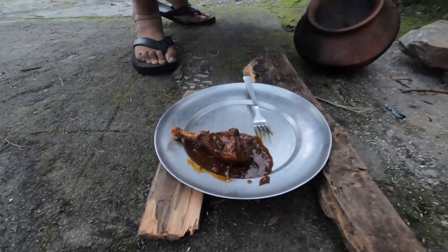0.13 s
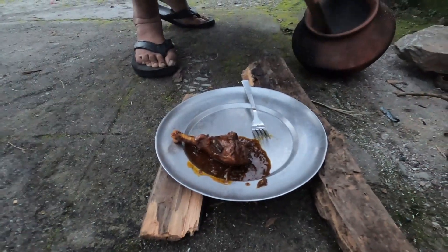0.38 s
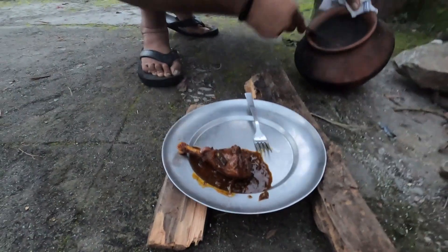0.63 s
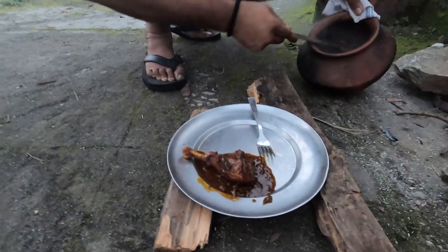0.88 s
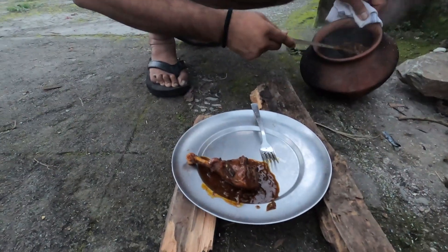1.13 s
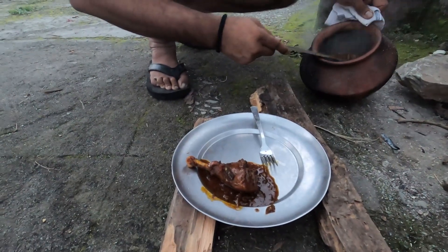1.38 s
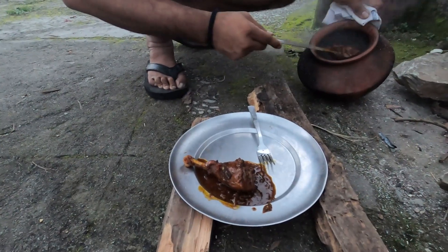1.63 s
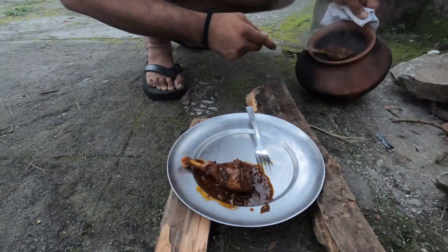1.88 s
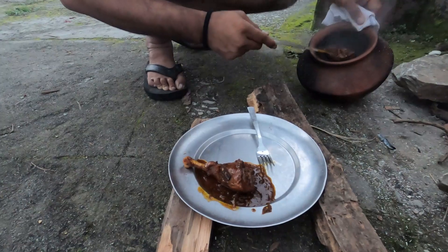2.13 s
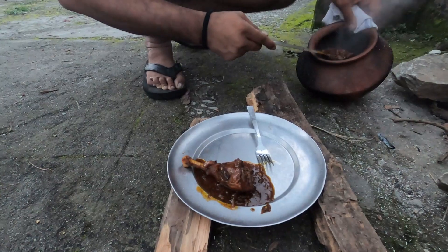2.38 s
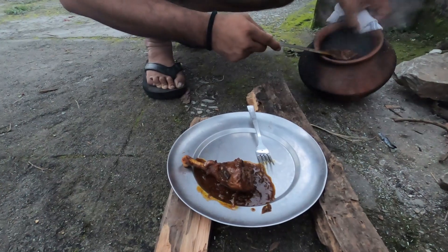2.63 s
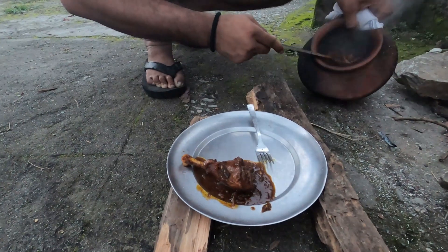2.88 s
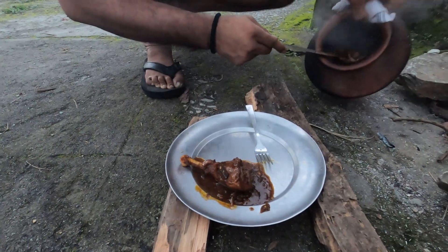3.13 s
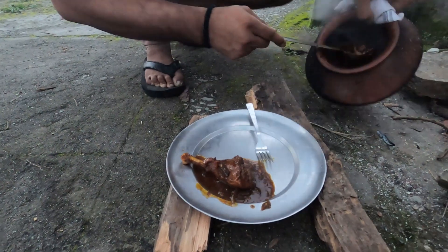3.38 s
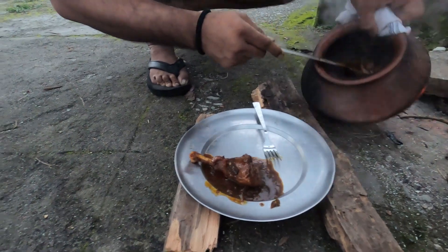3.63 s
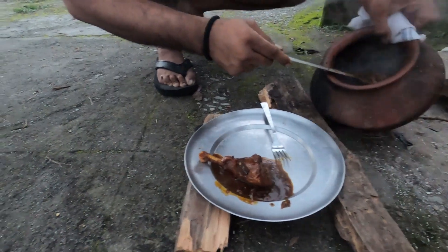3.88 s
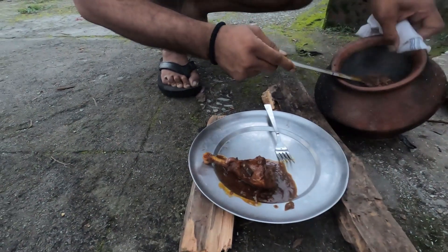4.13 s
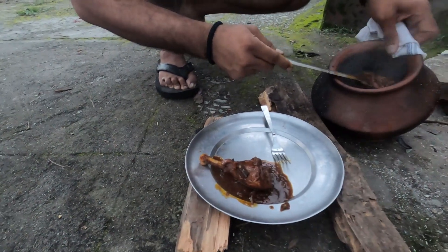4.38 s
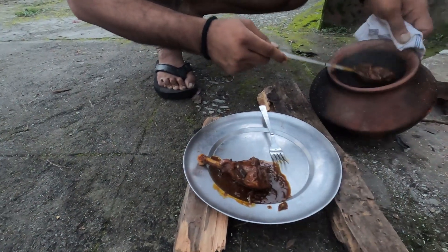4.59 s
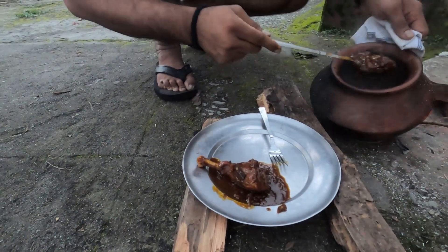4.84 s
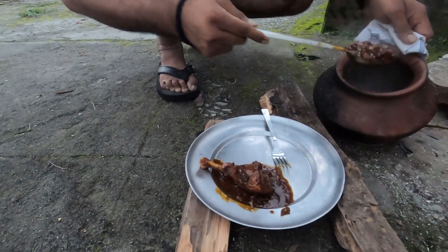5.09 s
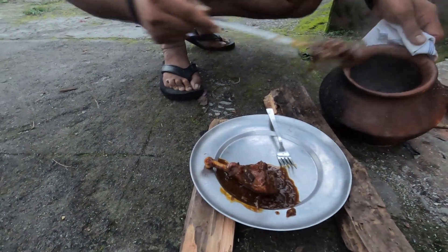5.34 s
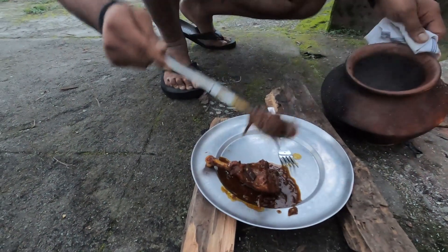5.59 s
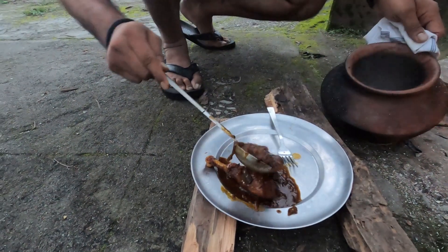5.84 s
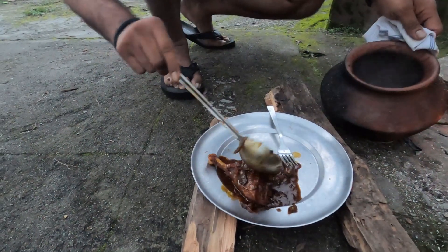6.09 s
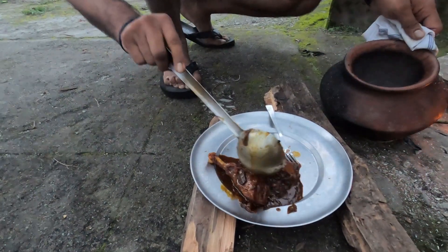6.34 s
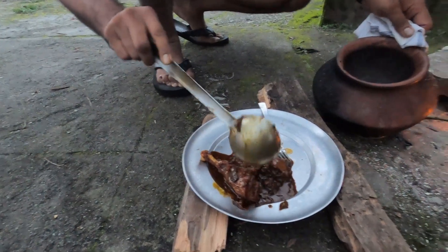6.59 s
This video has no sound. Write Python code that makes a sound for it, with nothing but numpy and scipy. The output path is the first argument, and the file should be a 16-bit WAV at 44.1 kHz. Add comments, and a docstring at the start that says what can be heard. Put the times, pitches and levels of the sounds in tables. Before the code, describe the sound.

Outdoors, close to the microphone, a metal ladle scrapes and knocks a clay pot, busiest in the first second. Hot gravy crackles lightly, with sharper pops later. Scattered bumps follow, including a deep thud past the middle. Near the end the ladle squeaks briefly, taps a steel plate and gives one very loud clank. Very deep gusts of wind push the microphone throughout, over faint hiss and a low murmur.

```python
"""Gusty wind outdoors shoves the microphone far below hearing, up to full scale, over hiss and a low murmur.
A clay pot is dragged and tipped on stony ground: its wall modes ring to knocks and scrapes of a metal
ladle, densest in the first second. Hot gravy crackles throughout as short rising sine bursts, with louder
pops from 1.65 s; faint thin sine tones come and go from 1.3 s. From about 5.8 s the ladle slides on a steel
plate, a second bank of modes, squeaking once near 5.9 s and then tapping and sliding on."""
import sys
import numpy as np
from scipy import signal
from scipy.fft import rfft, irfft
from scipy.io import wavfile
from scipy.ndimage import uniform_filter1d

SR = 44100
rng = np.random.default_rng(int(sys.argv[2]) if len(sys.argv) > 2 else 0)


def elevation(decibels):
    """Turn decibel levels (scalar or array-like) into linear amplitude ratios."""
    levels = np.asarray(decibels, float)
    return 10 ** (levels / 20)


def pcm_store(signal):
    """Save signal as 16-bit PCM."""
    levels = np.round(np.clip(np.atleast_2d(signal), -1, 1) * 32767)
    wavfile.write(sys.argv[1], SR, levels.astype(np.int16).T)


N = 296872  # samples


def evened(x):
    """Scales to rms 1."""
    return x / np.sqrt(np.mean(x ** 2) + 1e-20)


def curve(rows):
    """Reads every column of a time table, sample by sample."""
    s, *columns = np.transpose(rows)
    return [np.interp(np.arange(N) / SR, s, column) for column in columns]


def noise():
    """White noise as long as the scene."""
    return rng.standard_normal(N)


def coloured(x, points):
    """Gives x the spectrum drawn by points, at rms 1."""
    point_hz, point_db = np.transpose(points)
    hz = np.fft.rfftfreq(len(x), 1 / SR)
    shape_db = np.interp(np.log(hz + 0.024), np.log(point_hz), point_db)
    return evened(irfft(rfft(x) * elevation(shape_db), len(x)))


def steadied(x, seconds):
    """Divides out chance swells slower than seconds."""
    size = int(seconds * SR)
    power = uniform_filter1d(uniform_filter1d(x ** 2, size), size)
    return evened(x / np.sqrt(abs(power) + .03))


def wobble(size, seconds, count=1):
    """Smooth chance, rms 1, changing within about seconds."""
    width = int(seconds * SR)
    return evened(uniform_filter1d(uniform_filter1d(rng.standard_normal((count, size)), width), width))


def add(mix, s, sound):
    """Mixes a sound in at time s."""
    part = mix[round(s * SR):][:len(sound)]
    part += sound[:len(part)]


def resonate(x, hz, width):
    """A resonance that can glide: shifts the pitch hz down to zero, smooths, and shifts back."""
    turn = np.exp(2j * np.pi * np.cumsum(hz * np.ones(len(x))) / SR)
    r = np.exp(-np.pi * width / SR)
    return 2 * (turn * signal.lfilter([1 - r], [1, -r], x / turn)).real


def near(hz, centre_hz, spread):
    """Bell-shaped weight around a pitch, spread in octaves."""
    return np.exp(-(np.log2(hz / centre_hz) / spread) ** 2 / 2)


def slips(size, per_s, spread_db, smooth):
    """Uneven stick-slip clicks over a smoother hiss."""
    sizes_db = spread_db * np.minimum(rng.exponential(1, size), 3)
    clicks = elevation(sizes_db) * (rng.random(size) < per_s / SR)
    return evened(clicks * rng.choice([-1, 1], size)) + smooth * rng.standard_normal(size)


# Spectrum of the slow heave. Each row: frequency in Hz, relative density in dB per Hz.
HEAVE_SPECTRUM = [(.5, 4), (10, 0.5), (14, -5), (18, -25.5), (24, -14), (32, -73), (45, -93), (200, -170)]
# Strength of the heave ahead of the soft stop. Each row: time in seconds, level in dB before the eddies.
HEAVE_LEVEL = [(0.0, -11), (0.13, 0), (0.17, -14.5), (0.43, -1), (0.49, -7.5), (1.08, -9.5), (1.31, -2),
               (1.42, -14.5), (1.7, -7), (1.93, -18.5), (2.62, -12.5), (2.75, -29.5), (2.92, -12.5),
               (3.9, -19), (3.94, -8), (4.63, -18), (4.95, -11.5), (5.08, -13), (5.34, -6.5), (5.47, -12),
               (5.57, -18.5), (5.66, -12), (6.05, -20.5), (6.17, -5), (6.69, -20), (6.73, -48)]
# Spectrum of the audible buffeting. Each row: frequency in Hz, relative density in dB per Hz.
BUFFET_SPECTRUM = [(12, -28), (22, -1.5), (30, 3.5), (45, -5.5), (70, -20), (110, -29.5), (200, -65.5),
                   (400, -100), (2000, -150)]
# Strength of the buffeting. Each row: time in seconds, level in dB before the eddies.
BUFFET_LEVEL = [(0.0, -24), (0.03, -18.5), (0.17, -30.5), (0.24, -20), (0.39, -30), (0.67, -24),
                (0.71, -30.5), (0.82, -28), (1.07, -39.5), (1.31, -16.5), (1.44, -50), (1.52, -35),
                (1.63, -34.5), (1.78, -50), (1.85, -50), (1.91, -62), (2.06, -36), (2.12, -52), (2.21, -35),
                (2.34, -63), (2.49, -31.5), (2.53, -43), (2.64, -33), (2.85, -60), (3.2, -38.5),
                (3.28, -39.5), (3.84, -49), (3.97, -46), (4.03, -53), (4.23, -49), (4.52, -43), (4.57, -61),
                (4.78, -37), (4.85, -45), (4.95, -30.5), (5.08, -48), (5.85, -46), (5.98, -33), (6.07, -59),
                (6.73, -42)]


def wind():
    """Slow pressure lumps drive the membrane to a soft stop; faster buffeting rides on top; eddies shake both."""
    heave_eddy, buffet_eddy = wobble(N, 0.094, count=2)
    heave_db = curve(HEAVE_LEVEL)[0] + 0.5 * heave_eddy
    push = elevation(heave_db) * steadied(coloured(noise(), HEAVE_SPECTRUM), 0.051)
    stopped = push / (1 + push ** 4) ** (1 / 4)
    heave = signal.sosfiltfilt(signal.butter(4, 23, fs=SR, output="sos"), stopped)
    buffet_db = curve(BUFFET_LEVEL)[0] + 2.5 * buffet_eddy
    buffet = steadied(coloured(noise(), BUFFET_SPECTRUM), 0.048)
    return heave + elevation(buffet_db) * buffet


# Spectrum of the open-air hiss. Each row: frequency in Hz, relative density in dB per Hz.
AIR_SPECTRUM = [(41, -14.5), (70, -1), (92, -7.5), (194, -15), (326, -13), (438, -9.5), (537, -21.5),
                (629, -18.5), (1060, -30), (1300, -23.5), (1550, -30), (3930, -29.5), (15600, -48.5)]
# Hollows that hum. Each row: pitch in Hz, width of each of two filter passes in Hz, relative level in dB.
HOLLOWS = [(132, 63, 1.5), (237.7, 76, -5.5), (91, 97, -5)]
# Level of the murmur over time, lowest near 1.2 s. Each row: time in seconds, level in dB.
MURMUR_LEVEL = [(0, -52), (.62, -51), (.8, -61), (1.2, -69), (2.2, -54), (4.09, -54.5), (4.54, -60.5),
                (5.04, -58.5), (5.94, -53.5), (6.43, -56.5), (6.73, -56)]


def air():
    """Soft broad hiss; below it a murmur that hums in nearby hollows; hiss and hums each waver."""
    *hum_wavers, hiss_waver = wobble(N, 0.021, count=len(HOLLOWS) + 1)
    murmur = np.zeros(N)
    for (hz, width, db), waver in zip(HOLLOWS, hum_wavers):
        hum = resonate(resonate(noise(), hz, width), hz, width)
        murmur += elevation(db + 3 * waver) * evened(hum)
    hiss = elevation(-55 + 2.2 * hiss_waver) * coloured(noise(), AIR_SPECTRUM)
    return hiss + elevation(curve(MURMUR_LEVEL)[0]) * evened(murmur)


# Faint thin tones. Each row: start in seconds, end in seconds, start pitch in Hz, end pitch in Hz
# (both before drift), level in dB before flutter.
WHISTLES = [(1.326, 1.36, 1316, 1280, -68), (1.455, 1.64, 1320, 1320, -65.5),
            (1.667, 1.872, 1320, 1317, -65.5), (1.934, 2.06, 1320, 1317, -84),
            (2.3, 2.344, 1360, 1484, -65.5), (2.335, 2.4, 1446, 1420, -65), (2.366, 2.396, 1464, 1300, -71),
            (2.357, 2.578, 1344, 1282, -64.5), (2.587, 2.745, 1325, 1305, -65),
            (2.794, 3.114, 1326, 1346, -70), (3.317, 3.49, 224, 239.6, -53.5),
            (4.152, 4.262, 801, 795, -57), (4.634, 4.75, 1233, 1220, -68), (4.804, 5.075, 1224, 1287, -72),
            (4.97, 5.27, 1322, 1305, -63), (5.223, 5.496, 1320, 1320, -70.5),
            (5.504, 5.58, 1276, 1230, -58.5), (5.962, 6.03, 969, 960, -56.5),
            (6.527, 6.76, 1296, 1320, -65.5), (6.541, 6.74, 3760, 3750, -68.5)]
# The ladle's one squeak: start in seconds, end in seconds, fundamental in Hz.
SQUEAK = (5.865, 5.935, 500)
# Overtones of the squeak. Each row: multiple of the fundamental, level in dB before flutter.
SQUEAK_OVERTONES = [(2, -68), (3, -66), (4, -67), (5, -69), (6, -63), (8, -73)]


def thin_tones():
    """Gliding sines for the tones and the squeak, each blurred by narrow noise and wavering."""
    out = np.zeros(N)
    start, end, pitch_hz = SQUEAK
    squeak = [(start, end, k * pitch_hz, k * pitch_hz, db) for k, db in SQUEAK_OVERTONES]
    for start, end, start_hz, end_hz, db in list(WHISTLES) + squeak:
        size = int((end - start) * SR)
        drift, flutter = wobble(SR, .02, count=2)[:, :size]
        hz = np.linspace(start_hz, end_hz, size) + 5 * drift
        blur = evened(resonate(rng.standard_normal(SR)[:size], hz, 30))
        tone = np.sin(2 * np.pi * np.cumsum(hz) / SR) + 0.5 * blur
        add(out, start, elevation(db + 2 * flutter) * tone * signal.windows.tukey(size, .45))
    return out


def pop(hz, cycles):
    """A bursting bubble: a few cycles, rising slightly."""
    turns = np.arange(300) / SR * hz
    return np.sin(2 * np.pi * turns * (1 + 0.0018 * turns)) * np.exp(-turns / cycles) * np.minimum(turns / 2, 1)


# The loudest bursting bubbles. Each row: time in seconds, level in dB before the burst's own
# envelope, starting pitch in Hz.
POPS = [(1.6508, -43, 3900), (1.6966, -41, 7500), (1.8667, -38.5, 6060), (1.9151, -46, 3670),
        (2.0189, -37, 7340), (2.1033, -44, 3830), (2.2188, -41, 3800), (2.3865, -42, 4500),
        (2.4435, -41.5, 3800), (2.5301, -40.5, 3900), (2.5735, -47, 3000), (2.794, -39, 7000),
        (3.102, -45, 5540), (3.113, -44, 8000), (3.136, -45, 8700), (3.15, -48, 5500), (3.198, -43, 7500),
        (3.199, -45, 10000), (3.25, -48, 7750), (3.292, -46, 4080), (3.44, -46, 7600), (3.476, -44, 7740),
        (3.3428, -42, 3370), (3.3739, -37.5, 7600), (3.5194, -40, 7240), (3.6135, -38.5, 7260),
        (3.627, -41, 3700), (3.66, -43, 5800), (3.801, -52, 5500), (3.896, -46, 5200), (3.903, -51, 6800),
        (3.961, -46, 6200), (4.092, -43, 7220), (4.207, -47, 7200), (4.295, -46, 4700), (4.18, -43, 6440),
        (4.4046, -40, 6400), (4.7039, -42.5, 6800), (4.76, -38, 6600), (4.879, -40, 3940),
        (5.1295, -42, 3500), (5.4507, -40, 9900), (5.5205, -36, 9550), (5.6765, -43, 3200),
        (5.7785, -44, 6460), (5.806, -49, 5200), (5.8262, -38.5, 3800), (5.98, -39.5, 4000),
        (6.466, -41, 3300), (6.581, -44, 7860), (6.636, -50, 5000), (6.636, -50, 7700), (6.71, -51, 4900)]
# Upper pitches of the small bubbles in Hz; each bubble sounds somewhat below one of them.
SIZZLE_TOPS = [2940, 3800, 4000, 5000, 6600, 6400, 7500, 8000, 10400, 13100]


def gravy():
    """Loud pops over a scatter of small ones; the pot wall throws each back a moment later."""
    out = np.zeros(N)
    for s, db, hz in POPS:
        add(out, s, elevation(db) * pop(hz, 3.5))
    when, pitch, detune, size = rng.random((1500, 4)).T
    times = np.cumsum(-np.log(1 - when)) / 70  # 70 small pops a second on average
    tops = np.take(SIZZLE_TOPS, (pitch * len(SIZZLE_TOPS)).astype(int))
    pitches = tops * (0.515 + 0.46 * detune)
    levels_db = -57 - 3.5 * np.log(1 - .985 * size)
    for s, hz, db in zip(times, pitches, levels_db):
        add(out, s, elevation(db) * pop(hz, 2.5))
    # each later echo also repeats the earlier ones
    for delay_s, db in ((.0025, -10), (.0085, -14), (.0125, -12)):
        add(out, delay_s, elevation(db) * out[:N - round(delay_s * SR)].copy())
    return out


# Light, unbroken rubbing on clay. Each row: time in seconds, grit level in dB, low ring level in dB.
DRAG_LEVELS = [(0, -61, -58), (.8, -62, -62), (1.42, -66, -68), (2.53, -63, -64), (2.96, -62, -58),
               (3.67, -60, -62), (4.22, -61, -60), (4.8, -64, -64), (5.7, -63, -62), (6.3, -63, -59),
               (6.73, -62, -63)]
# Spectrum of the grit. Each row: frequency in Hz, relative density in dB per Hz.
GRIT_SPECTRUM = [(590, -9), (1000, -3.5), (1400, -6), (1760, -8), (2040, -3), (3160, -6.5), (3460, -7),
                 (5180, -17.5), (7750, -11.5), (15600, -23.5)]


def drag():
    """Faint grit, and a low ring of the pot wall set off in lumps by small nudges."""
    grit_db, low_db = curve(DRAG_LEVELS)
    nudges = slips(N, 30, 3, 0.52)
    low = steadied(evened(resonate(resonate(nudges, 438, 60), 438, 90)), .2)
    grit = steadied(coloured(slips(N, 300, 4.0, 0.8), GRIT_SPECTRUM), .12)
    return elevation(grit_db) * grit + elevation(low_db) * low


def strokes(rows, modes, bare, damping):
    """Slips excite the modes near the stroke's pitch; part of the grit is heard bare."""
    bite_s, lift_s, ease_db_per_s = 0.008, 0.055, -15  # a stroke bites in, eases off and lifts
    out = np.zeros(N)
    bins = np.fft.rfftfreq(SR, 1 / SR) + 1
    hz, db, t60 = np.transpose(modes)[:, :, None]
    half_width = 1.22 / (t60 * damping)  # Hz
    body = (elevation(db) * half_width / (half_width + 1j * (bins - hz))).sum(0) + bare
    for start, end, level_db, centre_hz, spread in rows:
        size = int((end - start) * SR)
        judder_db = 3 * wobble(SR, .004)[0]  # uneven pressure
        rough = (slips(SR, 700, 3.2, 1.27) * elevation(judder_db))[:size]
        t = np.arange(size) / SR
        edges = np.minimum(t / bite_s, 1) * np.minimum(t[::-1] / lift_s, 1)
        shape = edges * elevation(level_db + ease_db_per_s * (t - t.mean()))
        sound = irfft(rfft(rough * shape, SR) * body * near(bins, centre_hz, spread))[:size + 2000]
        add(out, start, sound * np.linalg.norm(shape) / np.linalg.norm(sound))
    return out


def blows(events, modes, firm_damping, crack, clatter, clatter_s, rise_turns):
    """Each blow rings modes near its pitch; a short crack and dense clatter stand for countless finer modes."""
    firm_db, longer_per_db = -34, 0.012  # firm_damping holds at this level; harder blows ring longer
    contact_s = 0.00078  # shortest rise of a blow
    out = np.zeros(N)
    t = np.arange(SR // 4) / SR
    hz, db, t60 = np.transpose(modes)[:, :, None]
    bins = np.fft.rfftfreq(len(t), 1 / SR) + 1
    above = np.minimum(bins / hz.min(), 1) ** 3  # thins the noise below the lowest mode
    for s, level_db, centre_hz, spread in events:
        damping = firm_damping * np.exp(longer_per_db * (level_db - firm_db))
        # where it lands sets a little strength (dB) and phase (turns)
        place_db, place_turns = rng.random((2, len(modes), 1)) * [[[3.5]], [[.3]]]
        strength = near(hz, centre_hz, spread) * elevation(db + place_db - 60 * t / (t60 * damping))
        ring = (strength * np.sin(2 * np.pi * (hz * t + place_turns))).sum(0)
        tint = above * near(bins, 0.97 * centre_hz, 1.27 * spread)
        puff = evened(irfft(rfft(rng.standard_normal(len(t))) * tint, len(t)))
        crack_fade = crack * elevation(-60 * t / (.04 * damping))
        clatter_fade = clatter * elevation(-60 * t / (clatter_s * damping))
        # low blows are soft, slow contacts
        rise_s = rise_turns / centre_hz + contact_s
        onset = np.sin(np.pi / 2 * np.minimum(t / rise_s, 1)) ** 2
        hit = ring / abs(ring).max() + (crack_fade + clatter_fade) * puff
        add(out, s, elevation(level_db) * hit * onset)
    return signal.sosfilt(signal.butter(4, .8 * hz.min(), "high", fs=SR, output="sos"), out)


# Steel plate under food. Each row: mode in Hz, relative level in dB, 60 dB decay in seconds before damping.
PLATE_MODES = [(536, -10.5, 0.19), (688, 0.5, 0.12), (766, 9.5, 0.052), (880, -3, 0.14), (1070, -9, 0.18),
               (1140, -6, 0.12), (1332, -0.5, 0.085), (1478, 9.5, 0.053), (1540, -6, 0.17),
               (2045, -43, 0.076), (1776, -26, 0.11), (2540, -15.5, 0.17), (2640, 1.5, 0.036),
               (2730, -2.5, 0.039), (2800, -15, 0.078), (3100, 1.5, 0.05), (3180, -11, 0.11),
               (3300, 1.5, 0.044), (3350, -12, 0.12), (3760, -16, 0.14), (3850, -15.5, 0.18),
               (4670, -25, .15), (5000, -11, .05), (5100, -28, .12), (5800, -3, 0.16), (6400, -4, 0.12),
               (7900, 13, 0.021)]
# Strokes along the plate. Each row: start in seconds, end in seconds, level in dB at mid-stroke,
# best-driven pitch in Hz, spread in octaves.
SLIDES = [(5.79, 5.85, -59, 1030, 0.22), (5.845, 5.96, -56.5, 1390, 0.64), (6.025, 6.085, -48, 850, 0.11),
          (6.03, 6.085, -47.5, 1560, 0.97), (6.21, 6.33, -61.5, 1310, 0.11), (6.5, 6.76, -66.5, 1270, 0.23),
          (6.58, 6.72, -65, 3800, 0.087)]
# Ladle on the plate. Each row: time in seconds, level in dB, best-driven pitch in Hz, spread in octaves.
TAPS = [(5.977, -35, 1040, 0.76), (6.0276, -28, 814, 0.33), (6.028, -34, 2600, 0.72),
        (6.0455, -30.5, 2520, 0.15), (6.049, -35.5, 1480, 0.12), (6.3385, -33, 2980, 0.86),
        (6.3875, -5.5, 1210, 1), (6.388, -14, 3180, 0.22), (6.496, -41.5, 1280, 0.16),
        (6.497, -42.5, 3800, 0.15)]


def plate():
    """Steel modes slid along and tapped by the ladle; food shortens the taps' ring times."""
    slides = strokes(SLIDES, PLATE_MODES, bare=0.97, damping=2.4)
    taps = blows(TAPS, PLATE_MODES, firm_damping=0.61, crack=0.049, clatter=0.054, clatter_s=0.14,
                 rise_turns=0.35)
    return slides + taps


# Clay pot. Each row: mode in Hz, relative level in dB, 60 dB decay in seconds before damping.
POT_MODES = [(67, -9, 0.08), (104, 11, 0.087), (232, 9, 0.074), (300, -25, 0.048), (435, 20, 0.091),
             (550, -23, 0.06), (663, 10, 0.079), (850, 18.5, 0.049), (1155, 6.5, 0.025), (1320, 1, 0.037),
             (1570, -21, 0.019), (1855, 6.5, 0.021), (1990, -0.5, 0.059), (2400, 7, 0.049),
             (2837, 1, 0.015), (3292, 3.5, 0.085), (3800, 8, 0.044), (6060, 5.5, 0.025), (7000, 4, 0.0073)]
# Strokes along the pot; a firm one grinds high and makes the wall hum low. Each row: start in seconds,
# end in seconds, level in dB at mid-stroke, best-driven pitch in Hz, spread in octaves.
SCRAPES = [(0, .10, -49, 1490, 1.2), (.146, .275, -53.5, 2620, 0.77), (.146, .255, -55, 8140, 0.91),
           (.325, .56, -48, 2740, 0.56), (.33, .53, -59, 8650, 0.95), (.365, .405, -38, 2580, 0.52),
           (.415, .45, -42, 3000, 0.44), (.36, .545, -39.5, 405, 0.43), (.35, .42, -44.5, 1070, 0.63),
           (.39, .5, -48.5, 253, 0.11), (.44, .51, -55, 7000, 0.49), (.61, .765, -52, 2400, 0.79),
           (.61, .775, -60.5, 8140, 0.93), (.61, .665, -43, 900, 0.15), (.665, .745, -47.5, 925, 0.15),
           (.80, 1.03, -60.5, 1470, 0.14), (.79, 1.06, -60, 2800, 0.63), (.92, 1.09, -59, 435, 0.4),
           (2.733, 2.85, -60, 2370, 0.23), (2.82, 2.955, -58.5, 1970, 0.2), (2.96, 3.14, -60, 433, 0.31),
           (2.83, 2.9, -54, 2920, 0.6), (2.885, 2.96, -53.5, 2800, 0.53), (2.84, 2.96, -63.5, 7250, 0.54),
           (3.2, 3.6, -66, 670, 0.15), (4.1, 4.33, -63, 2630, 0.49)]
# Blows on the pot; a heavy one is a low thud and a brighter tick close together. Each row: time in
# seconds, level in dB, best-driven pitch in Hz, spread in octaves.
KNOCKS = [(0.006, -31.5, 860, 0.11), (0.0229, -24.5, 850, 0.053), (0.023, -29, 440, 0.17),
          (0.146, -34.5, 880, 0.09), (0.1476, -36.5, 2400, 0.66), (0.1735, -24.5, 900, 0.21),
          (0.174, -28.5, 2020, 0.38), (0.1745, -33.5, 280, 0.28), (0.3329, -37.5, 2570, 0.43),
          (0.3555, -27, 824, 0.32), (0.356, -37, 2230, 0.25), (0.393, -33.5, 2430, 0.4),
          (0.4235, -35, 2930, 0.32), (0.462, -37, 1090, 0.19), (0.4817, -34.5, 2400, 0.7),
          (0.5675, -40.5, 1150, 0.51), (0.611, -44, 2500, 0.13), (0.612, -54, 3800, 0.15),
          (0.678, -39, 1270, 0.36), (0.7445, -35, 1950, 0.88), (0.745, -53, 3640, 0.16),
          (0.811, -41.5, 2950, 0.083), (0.883, -61, 3400, 0.17), (0.9235, -42, 3200, 0.25),
          (0.931, -39, 440, 0.17), (0.962, -46.5, 4940, 0.25), (0.968, -37.5, 2750, 0.15),
          (0.977, -35.5, 450, 0.38), (0.978, -36, 1810, 0.15), (0.9775, -36, 1180, 0.23),
          (1.024, -42, 437, 0.15), (1.076, -51, 435, 0.13), (1.076, -48, 3520, 0.17),
          (1.144, -50, 2500, 0.24), (1.7182, -48, 614, 0.57), (1.9986, -38, 429, 0.056),
          (2.5738, -48, 1950, 1.2), (2.587, -34.5, 305, 0.14), (2.588, -38, 1530, 0.55),
          (2.741, -57, 2350, 0.15), (2.762, -44, 435, 0.13), (2.779, -41.5, 1390, 0.55),
          (2.811, -41, 1000, 0.77), (2.8838, -36.5, 2460, 0.21), (2.8845, -46, 7000, 0.77),
          (2.886, -50, 440, 0.15), (2.915, -45, 3300, 0.3), (2.943, -46, 427, 0.13),
          (3.1686, -45, 990, 0.77), (3.197, -60, 1410, 0.42), (3.257, -61, 800, 0.28),
          (3.5073, -46, 1910, 0.15), (3.5563, -39.5, 1390, 0.16), (3.683, -43.5, 450, 0.29),
          (3.684, -48.5, 2100, 0.092), (3.8013, -45, 5000, 0.47), (3.821, -28, 240, 0.52),
          (3.8242, -34.5, 764, 0.62), (3.8326, -34.5, 1630, 0.97), (4.0589, -38.5, 300, 0.33),
          (4.2863, -49.5, 1170, 0.19), (4.352, -20.5, 92, 0.49), (4.356, -26.5, 220, 0.14),
          (4.356, -39, 440, 0.19), (4.362, -44, 2880, 0.76), (4.463, -45, 430, 0.18),
          (4.4635, -39, 240, 0.37), (4.464, -45, 1410, 0.39), (4.648, -41.5, 493, 0.37),
          (4.682, -51, 1400, 0.3), (5.06, -45.5, 950, 0.48), (5.135, -49, 2100, 0.45),
          (5.326, -46.5, 650, 0.4), (5.5494, -45, 1390, 0.27), (6.6925, -42, 1340, 0.35)]


def pot():
    """Clay wall modes scraped and knocked by the ladle; hands shorten the knocks' ring times."""
    scrapes = strokes(SCRAPES, POT_MODES, bare=0.72, damping=0.39)
    knocks = blows(KNOCKS, POT_MODES, firm_damping=0.97, crack=0.46, clatter=0.12, clatter_s=0.16,
                   rise_turns=0.46)
    return scrapes + knocks


def scene():
    """All sources, in the open air."""
    background = wind() + air() + thin_tones()
    return (background + gravy() + drag() + plate() + pot())[None]


def low_pass(x):
    """Removes everything above the highest recorded frequency."""
    return signal.sosfilt(signal.butter(12, 15780, fs=SR, output="sos"), x)


def record(dry):
    """Clips whatever passes full scale."""
    mix = np.clip(dry, -1, 1)
    return low_pass(mix)


dry = scene()
out = record(dry)
pcm_store(out)
```